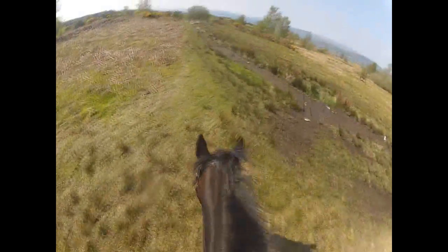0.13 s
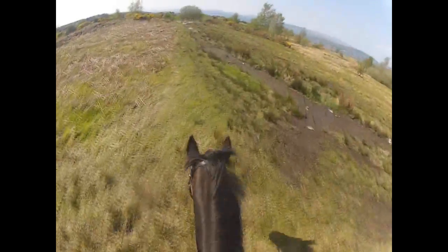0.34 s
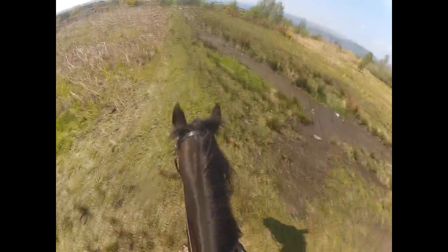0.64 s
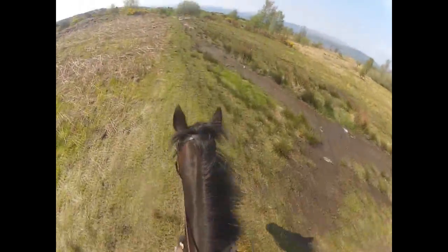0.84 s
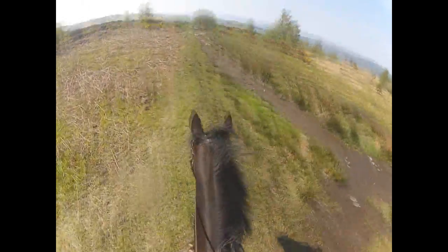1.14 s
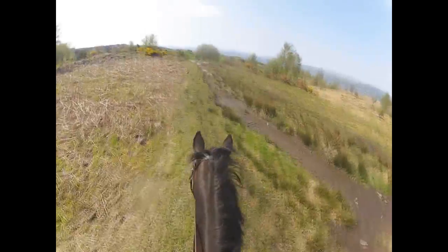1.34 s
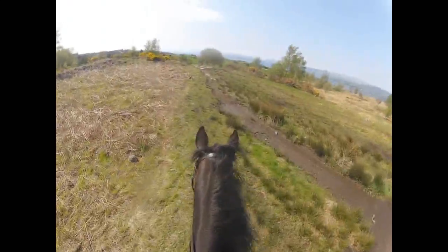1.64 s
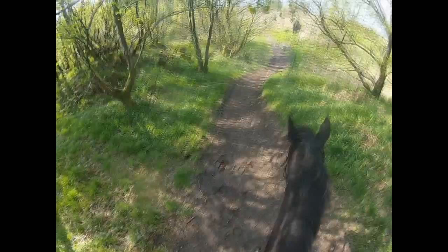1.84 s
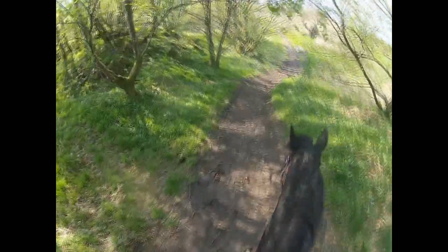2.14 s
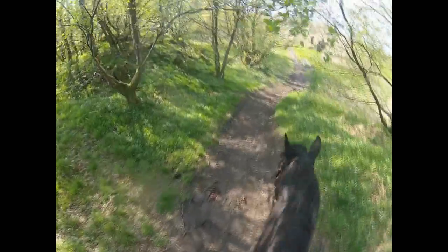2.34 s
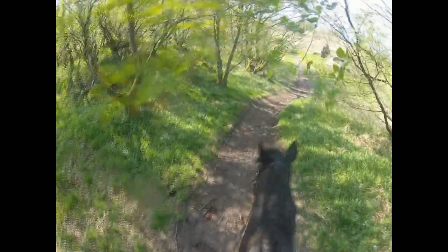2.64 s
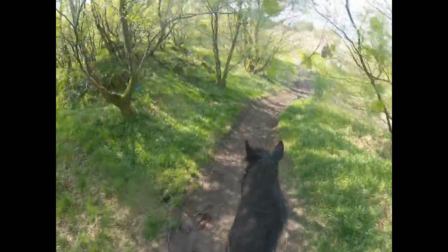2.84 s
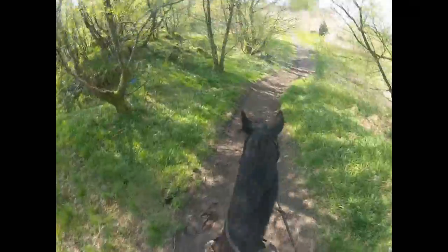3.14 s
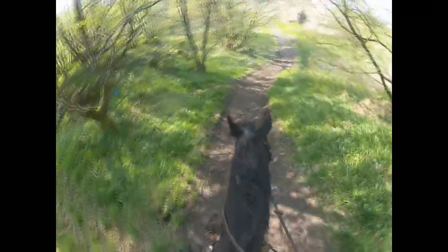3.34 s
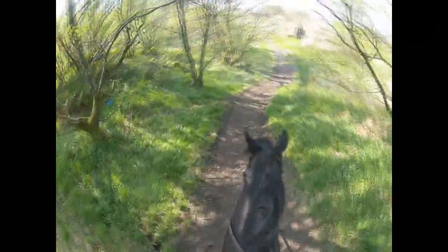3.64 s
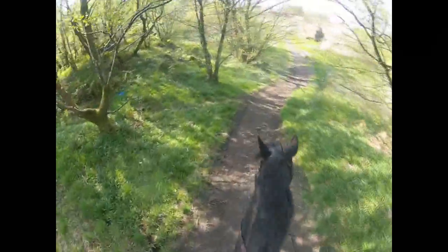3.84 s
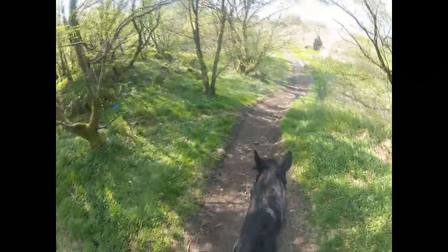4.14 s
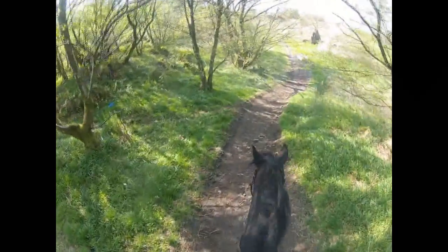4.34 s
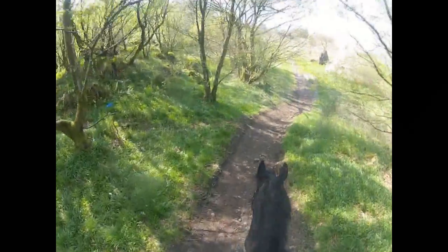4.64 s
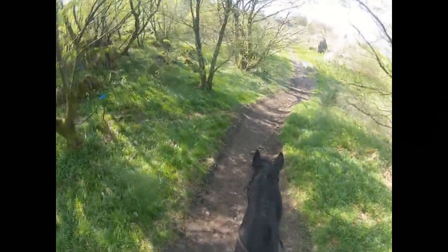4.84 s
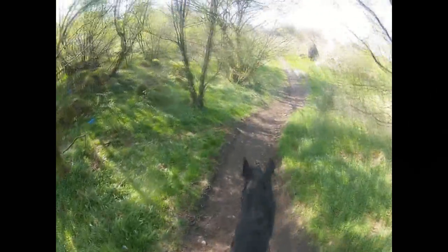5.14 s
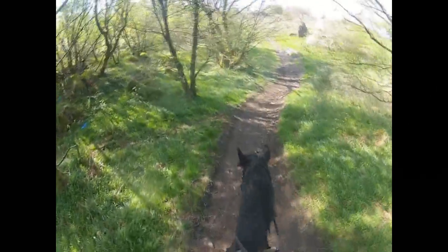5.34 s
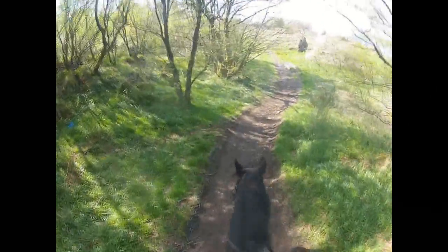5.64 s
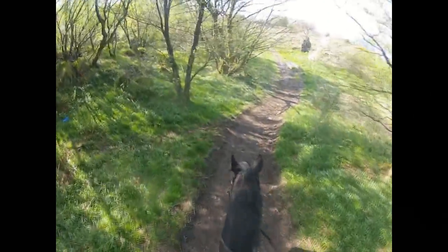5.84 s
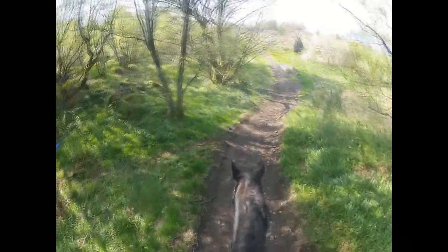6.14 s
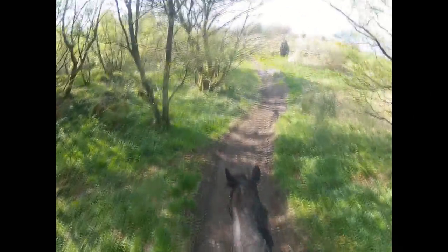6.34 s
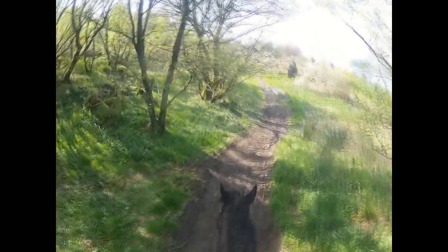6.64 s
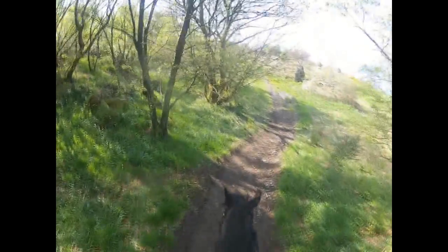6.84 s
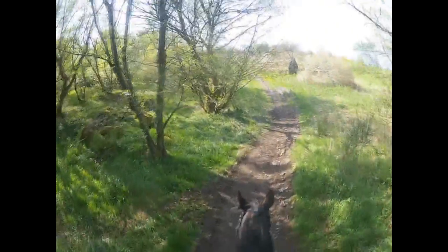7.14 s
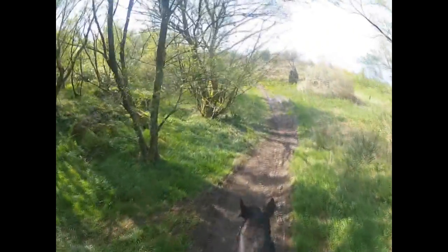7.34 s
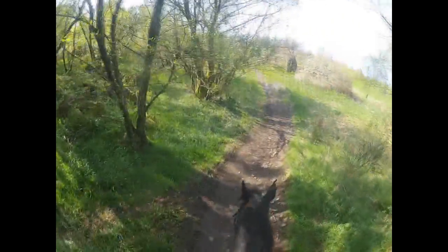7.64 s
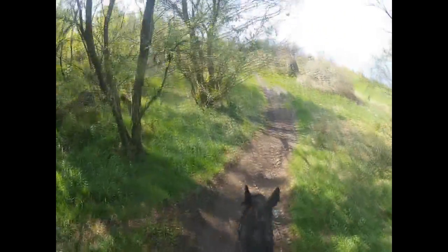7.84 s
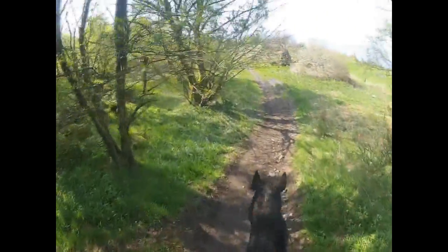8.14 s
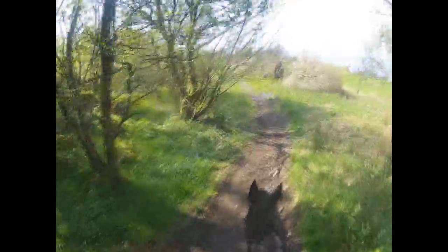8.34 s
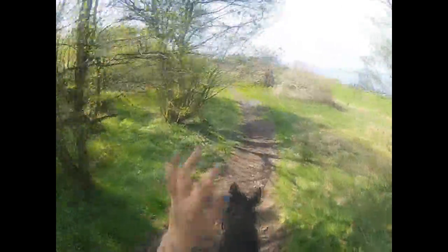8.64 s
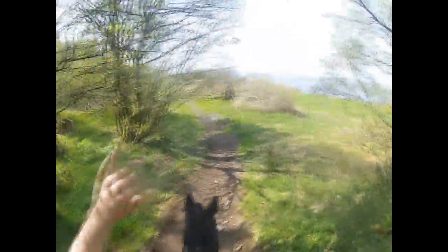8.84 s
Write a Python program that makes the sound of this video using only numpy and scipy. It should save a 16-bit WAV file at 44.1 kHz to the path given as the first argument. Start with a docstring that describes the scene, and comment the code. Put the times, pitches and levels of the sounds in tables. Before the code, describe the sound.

Muffled hoof thuds, creaks and small hollow knocks continue outdoors, interrupted by a leafy scrape and a very loud, sharp twig snap against the case.

```python
"""A horse trots over turf and then along a dirt track, heard from a cased camera worn by the rider.
Hoofbeats are short swells of bass; slipping and knocking gear is noise and impulses through ringing filters.
Leaves sweep over the case as dense tiny catches, and twigs strike it in short rattles that ring it.
A far bird chirps in gliding tones over shaped noise for the air, the wind and the swish of the ride.
The camera samples coarsely and holds each value, which mirrors the sound into the treble."""
import sys
import numpy as np
from scipy import signal
from scipy.fft import rfft, irfft, next_fast_len
from scipy.io import wavfile
from scipy.ndimage import uniform_filter1d, map_coordinates

SR = 44100
rng = np.random.default_rng(int(sys.argv[2]) if len(sys.argv) > 2 else 0)


def digitize_waveform(pressure):
    """Quantize a signal to 16-bit integers and store it at the path in sys.argv[1].

    Rows of a 2-D input are taken as channels; values are limited to [-1, 1].
    """
    field = np.atleast_2d(pressure).T
    bounded = np.clip(field, -1, 1)
    quanta = np.round(bounded * 32767).astype(np.int16)
    wavfile.write(sys.argv[1], SR, quanta)


N = 396900
TIME = np.arange(N) / SR  # [s]

# Levels in the tables are relative: the functions that use them may add a fixed trim.
# slips of the gear between the heavy beats: (start [s], length [s], level [dB])
CREAK_EVENTS = [(0, .04, -49.5), (.06, 0.077, -54), (.34, 0.082, -52.5), (.694, .12, -52.5),
                (1.04, .17, -52), (1.36, .1, -53), (1.49, 0.11, -54.5), (1.786, .13, -52),
                (2.685, 0.05, -57), (2.985, 0.082, -60), (3.405, .04, -60), (3.67, .045, -64),
                (4.474, 0.078, -57.5), (4.626, .033, -59), (4.689, .033, -50), (4.814, 0.028, -58.5),
                (4.961, .074, -58), (5.119, .03, -54), (5.186, 0.029, -49), (5.452, .06, -57.5),
                (5.885, 0.073, -54.5), (6.319, .043, -58), (6.528, 0.046, -61), (7.098, .033, -51),
                (7.196, .03, -61.5), (7.255, 0.044, -57), (7.32, 0.059, -58), (7.488, 0.057, -52),
                (7.765, 0.057, -54), (8.003, .02, -49), (8.148, 0.0456, -59), (8.26, .06, -57),
                (8.736, .11, -59.5), (8.925, 0.078, -56)]
# ring of the mount that holds the gear: (frequency [Hz], level [dB])
MOUNT_RING = [(350, -19.5), (560, -21.5), (690, -3.5), (860, -5.5), (1100, 4), (1400, -4), (1650, -2.5),
              (1900, -1.5), (2150, -13), (2800, -20.5), (3550, -22.5), (4100, -36), (5500, -53)]
# boom of the hollow case: (frequency [multiple of the body pitch], level [dB])
CASE_BOOM = [(.25, -28), (.46, -5.5), (.66, 0.5), (1, 1), (1.27, -5), (1.6, -9), (2.1, -21.5), (3.4, -33),
             (12, -95.5)]
# how much the gear jiggles, only at the trot on turf: (time [s], share [0-1])
TROT = [(0, 1), (1.9, 1), (2.02, 0)]
# air and cloth rushing past as the rider rises: (time [s], level [dB])
SWISH_LEVEL = [(0, -62.5), (1.9, -60), (2.1, -74), (6.3, -70), (7, -65.5), (9, -62)]
# tone colour of that rush: (frequency [Hz], level [dB])
SWISH_SPECTRUM = [(300, -12), (700, -5), (1200, -2), (2000, 0), (2650, -1), (3100, -15), (5000, -28)]
# tone colour of the outdoor hush: (frequency [Hz], level [dB])
HUSH_SPECTRUM = [(15, -13.5), (42, -3.5), (80, -9.5), (170, -12), (330, -15.5), (420, -20.5), (600, -25.5),
                 (1000, -31.5), (2000, -33), (3000, -37), (4500, -38), (5500, -39.5)]
# wind rumble, stronger at the faster pace on open turf: (time [s], level [dB])
WIND_LEVEL = [(0, -56), (1.3, -48.5), (2.1, -59.5), (8.7, -61), (9, -56)]
# tone colour of the wind rumble: (frequency [Hz], level [dB])
RUMBLE_SPECTRUM = [(15, -10.5), (42, 3.5), (75, -15), (140, -12.5), (300, -22), (700, -42.0), (2000, -88.5)]
# leaves sweeping over the case: (time [s], level [dB])
LEAF_LEVEL = [(1.99, -63.5), (2.096, -48), (2.186, -51.5), (2.246, -35), (2.264, -38.5), (2.344, -36.5),
              (2.354, -46), (2.364, -42), (2.39, -75)]
# tone colour of the leaves on the case: (frequency [Hz], level [dB])
LEAF_RING = [(59, -24.5), (100, -1.5), (224, -11), (256, -6), (370, -3.5), (562, -18.5), (654, -11),
             (870, -11.5), (1120, 2), (1280, -16), (1510, -2.5), (2810, -17.5), (3740, -17), (4280, -36),
             (5500, -30), (7150, -58)]
# heavy hoofbeats: (time [s], thud level [dB], level of the groan that leads into it [dB])
HOOFBEAT_EVENTS = [(0.287, -31, -47), (.639, -27.5, -48.5), (0.977, -30, -48.5), (1.334, -37.5, -50),
                   (1.714, -29, -50), (4.147, -41, -53), (5.229, -35, -52), (5.705, -41.5, -54.5),
                   (6.152, -33.5, -50), (7.118, -39.5, -48.5), (7.992, -31, -48), (8.489, -43, -57),
                   (8.945, -34, -51)]
# clear single knocks of the gear: (time [s], peak level [dB], boom of the case [dB])
KNOCK_EVENTS = [(0.447, -43, -47), (0.621, -40, -41), (0.926, -40, -36), (1.123, -39.5, -47),
                (1.483, -39, -41), (1.634, -41, -39.5), (1.709, -35, -42), (2.044, -42, -47),
                (2.688, -40.5, -44.5), (2.724, -46, -45), (3.037, -42, -44.5), (3.871, -39, -43),
                (3.938, -49, -50), (4.134, -39.5, -43), (4.313, -51.5, -51.5), (4.469, -38.5, -47),
                (4.675, -37.5, -40.5), (4.702, -39, -38), (4.859, -38, -43), (4.889, -44.5, -44),
                (4.971, -39.5, -41), (5.187, -41, -46.5), (5.34, -44.5, -50), (5.449, -45.5, -45),
                (5.596, -56.5, -43), (5.657, -43, -52), (5.791, -45, -45.5), (5.821, -42.5, -44),
                (5.89, -40, -47), (6.028, -54.5, -44), (6.122, -35.5, -42.5), (6.269, -43.5, -55),
                (6.386, -46, -45.5), (6.43, -43.5, -46.5), (6.581, -37.5, -44), (6.733, -40, -44),
                (6.755, -38, -40.5), (6.786, -37, -41), (7.098, -30, -38), (7.321, -45.5, -45),
                (7.57, -35, -41.5), (7.683, -38, -42.5), (7.731, -36, -44.5), (7.758, -41, -43.5),
                (8.001, -38.5, -41.5), (8.26, -38, -41), (8.294, -41, -44), (8.478, -31, -39),
                (8.626, -38.5, -42), (8.689, -36, -37), (8.861, -38.5, -41), (8.921, -31.5, -38)]
# twig strikes: (time [s], level [dB], contact length [s], leafy share [0-1], scrape after the blow [dB])
TWIG_STRIKES = [(1.95, -30.5, 0.0026, 0.46, -27), (3.274, -25, .0025, 0.3, -28),
                (3.282, 0.5, 0.0041, 0.05, -41), (3.291, -26, .0012, .1, -32),
                (3.3125, -25.5, 0.0033, .2, -21.5), (3.3625, -29, .004, 0.73, -27),
                (3.3715, -29, .0047, 0.56, -26), (3.378, -20.5, .0033, 0.81, -22.5)]
# ringing modes of the case under a hard strike: (frequency [Hz], width [Hz], level [dB])
CASE_MODES = [(192, 200, -10.5), (1850, 270, -1.5), (2690, 230, 4), (3042, 140, -6), (3500, 150, -1),
              (4500, 220, -21.5)]
# the case radiates little between its boom and its modes: (frequency [Hz], level [dB])
SHELL_RING = [(300, -1), (600, -10), (1100, -9), (1700, 1), (3600, -1.0), (5200, -3.5)]
# tone colour of a blow softened by leaves: (frequency [Hz], level [dB])
LEAFY_BLOW_RING = [(120, -42), (200, -12), (384, -9), (528, -17), (1120, -1), (1280, -10.5), (1490, -4),
                   (2390, -23), (3730, -15.5), (4850, -46), (5500, -39.5), (7150, -69), (12100, -120)]
# the case is jolted by the shoot and the twig: (time [s], level [dB], pitch [Hz])
CASE_JOLTS = [(2.283, -31, 59), (3.525, -19.5, 80.2), (3.536, -26, 41)]
# far bird notes: (start [s], length [s], start pitch [Hz], end pitch [Hz], level [dB])
BIRD_NOTES = [(2.458, 0.13, 4300, 4400, -74), (2.78, 0.1, 4400, 4350, -69), (4.707, .09, 4450, 4500, -70),
              (4.98, 0.15, 4450, 4400, -73), (6.813, 0.1, 4450, 4370, -66), (7.122, .12, 4450, 4330, -72)]
# tone colour of a very faint noise, opposite in the two channels: (frequency [Hz], level [dB])
SIDE_SPECTRUM = [(12, -31), (20, -1), (216, -25.5), (1050, -37), (2780, -31.5), (5000, -31), (5980, -47.5),
                 (6970, -36.5), (9000, -38.5), (11700, -73.5), (19800, -120)]

# The mount on each ground: case pitch [Hz], groan length [s], slips per second at CREAK_REF_DB,
# boom set against the rasp there [dB, before trims], extra boom per dB of force [dB]
TURF = dict(body_hz=215, groan_s=.07, slip_rate=195, boom_db=7, boom_grows=1.2)
TRACK = dict(body_hz=264, groan_s=.044, slip_rate=150, boom_db=7.5, boom_grows=-0.35)
TURF_END_S = 1.94
CREAK_REF_DB = -52
SLIP_DOUBLING_DB = 10  # this much more force doubles the slip rate, within limits
GROAN_LEAD_S = .083  # the weight comes onto the mount just before the thud
CREAK_TOP_HZ = 3500  # slipping is duller than a knock

SWISH_GROWS, SWISH_REF_DB = .6, -34  # dB of swish per dB of thud above this level
SWISH_LEAD_TURF_S, SWISH_LEAD_TRACK_S = .055, .11  # the swish peaks this long before a hoofbeat
SWISH_SPREAD = .8  # half width of a swish as a share of its lead
SWISH_REST = .14  # steady share of swish under the swells
SURGE_DB, SURGE_S = -14.5, 0.084  # rumble surge: level against the thud, half width

THUD_HZ = 42  # pitch of a hoofbeat
THUD_RISE_CYCLES = .27  # time constant of a thud's swell, in cycles of its pitch
REBOUND_S, REBOUND_LOSS_DB = .014, 10  # the gear bounces after a knock: mean flight, mean loss per bounce
SHUDDER_S, SHUDDER_FADE_S = 3.55, .1  # the case shudders around the hardest jolt
SHUDDER_DB, SHUDDER_HZ = -40, 130

HOLD_HZ = 12000  # sampling rate of the camera
BAND_HZ, TOP_HZ = 5500, 15500  # top of the band before sampling, top of the final sound


def amp(db):
    """Turn decibels into gain."""
    return 10 ** (np.asarray(db) / 20)


def unit(x):
    """Scale to an rms of 1."""
    return x / np.sqrt(np.mean(x ** 2) + 1e-20)


def crest(x):
    """Scale to a peak of 1."""
    return x / np.abs(x).max()


def add(track, s, sound):
    """Mix a sound into the track at time s, cutting off what runs past the end."""
    start = max(0, round(s * SR))
    part = track[start:start + len(sound)]
    part += sound[:len(part)]


def curve(rows):
    """Join (time [s], value) rows by straight lines."""
    return np.interp(TIME, *np.transpose(rows))


def wobble(rate):
    """A smooth random curve through this many random points a second."""
    points = rng.standard_normal(int(N * rate / SR) + 4)
    return map_coordinates(points, [TIME * rate])


def swell(s, half_width):
    """A smooth bump of height 1 around time s."""
    return np.exp(-((TIME - s) / half_width) ** 2)


def filtered(x, response):
    """Scale each frequency of x by response(frequency)."""
    size = next_fast_len(N + SR // 2)
    spectrum = rfft(x, size) * response(np.fft.rfftfreq(size, 1 / SR))
    return irfft(spectrum, size)[:N]


def low_pass(x, hz, order):
    """Take away the treble above hz without shifting the phase; a higher order is steeper."""
    return filtered(x, lambda f: 1 / np.sqrt(1 + (f / hz) ** (2 * order)))


def gain(points, hz):
    """Read the gain of (frequency [Hz], level [dB]) points on a log frequency axis."""
    f, db = np.transpose(points)
    return amp(np.interp(np.log(hz + 1), np.log(f), db))


def coloured_noise(points):
    """Noise of rms 1 with the given spectrum."""
    return unit(filtered(rng.standard_normal(N), lambda hz: gain(points, hz)))


def ring(points, size=4096):
    """The ringing of a body after one tap: an impulse response of energy 1 with the given spectrum."""
    cepstrum = irfft(np.log(gain(points, np.fft.rfftfreq(size, 1 / SR)) + 1e-6))
    # folding the cepstrum forward makes the response start at once (minimum phase)
    cepstrum[1:size // 2] *= 2
    cepstrum[size // 2 + 1:] = 0
    response = irfft(np.exp(rfft(cepstrum)))[:size // 2]
    return response / np.linalg.norm(response)


def boom(hz):
    """The hollow case ringing around one pitch."""
    return ring([(multiple * hz, db) for multiple, db in CASE_BOOM])


def slips(n, rate, uneven, scatter_db, count):
    """Stick and slip over n samples: impulses of varying size that slow down as the load settles, rms 1."""
    gaps, sizes = np.clip(rng.standard_normal((2, count)), -2, 2)
    at = np.cumsum(np.exp(uneven * gaps)) * SR / rate
    at = at * (.88 + .12 * at / n)  # the gaps grow longer
    places = (at - at[0] / 2).astype(int)
    return unit(np.bincount(places, amp(scatter_db * sizes), n)[:n])


def rattle(contact, size=2048):
    """A blow smeared over the contact time: each frequency has its own delay, all equally strong."""
    knots = rng.uniform(0, 1, size // 32)
    positions = np.linspace(0, len(knots) - 1, size // 2 + 1)
    delay = contact * np.interp(positions, np.arange(len(knots)), knots)
    phase = 2 * np.pi * np.cumsum(delay) * SR / size
    return irfft(np.exp(-1j * phase))[:size // 4]


def thud(db, hz):
    """A cycle or two of bass that swells and dies away."""
    t = np.arange(SR // 4) / SR
    u = t * hz / THUD_RISE_CYCLES
    envelope = crest(u * u * u * np.exp(-u))
    return amp(db) * envelope * np.sin(2 * np.pi * hz * t)


def ground_at(s):
    """Turf first, then the dirt track."""
    return TURF if s < TURF_END_S else TRACK


def creaks():
    """Under the load of a step the mount slips in a run; more force slips faster, evening into a groan."""
    out, rasp = np.zeros(N), ring(MOUNT_RING)
    groans = [(s - GROAN_LEAD_S, ground_at(s)["groan_s"], db) for s, _, db in HOOFBEAT_EVENTS]
    for start, length, db in groans + list(CREAK_EVENTS):
        ground = ground_at(start)
        force_db = db - CREAK_REF_DB
        n = max(int(length * SR), SR // 100)
        rate = np.clip(ground["slip_rate"] * 2 ** (force_db / SLIP_DOUBLING_DB), 75, 205)
        uneven = np.interp(rate, [90, 200], [.32, .17])  # fast slips are more regular
        load = 0.8 + 0.18 * np.hanning(n)  # the weight comes on and goes off again
        catches = slips(n, rate, uneven, scatter_db=4.5, count=64)
        rubbing = rng.standard_normal(SR)[:n]
        friction = load * (0.8 * catches + 0.62 * rubbing)
        boom_db = db + ground["boom_db"] + ground["boom_grows"] * force_db
        add(out, start, amp(db - 3) * signal.fftconvolve(friction, rasp))
        add(out, start, amp(boom_db - 2.0) * signal.fftconvolve(friction, boom(ground["body_hz"])))
    return low_pass(out, CREAK_TOP_HZ, order=3)


def jiggle():
    """At the trot the gear never rests between steps: wavering noise rings the mount and the case."""
    friction = curve(TROT) * amp(2.5 * wobble(25)) * rng.standard_normal(N)
    body = amp(-70.5) * ring(MOUNT_RING) + amp(-55.5) * boom(hz=230)
    return signal.fftconvolve(friction, body)[:N]


def swish():
    """Noise swells as the rider rises ahead of each hoofbeat: more for a heavier one, quicker on turf."""
    rising = np.full(N, SWISH_REST)
    for s, db, _ in HOOFBEAT_EVENTS:
        lead = SWISH_LEAD_TURF_S if s < TURF_END_S else SWISH_LEAD_TRACK_S
        strength = amp(SWISH_GROWS * (db - SWISH_REF_DB))
        rising = rising + strength * swell(s - lead, SWISH_SPREAD * lead)
    level = amp(curve(SWISH_LEVEL) + 1.2 * wobble(60))
    return level * rising * coloured_noise(SWISH_SPECTRUM)


def air():
    """Soft outdoor hush, wind rumble that surges with each heavy hoofbeat, and a faint narrow whine."""
    hush = coloured_noise(HUSH_SPECTRUM)
    rumble = coloured_noise(RUMBLE_SPECTRUM)
    whine = unit(filtered(rng.standard_normal(N), lambda hz: np.exp(-((hz - 5090) / 45) ** 2)))
    surges = sum(amp(db + SURGE_DB) * swell(s, SURGE_S) for s, db, _ in HOOFBEAT_EVENTS)
    wind = (amp(curve(WIND_LEVEL)) + surges) * amp(2.0 * wobble(10))
    hush_level = amp(-58.0 + 0.6 * wobble(11.0))
    return hush_level * hush + wind * rumble + amp(-85.5) * whine


def leaves():
    """A leafy shoot drags over the case in dense tiny catches; the colour shifts as the contact moves."""
    catches = slips(N, rate=520, uneven=.4, scatter_db=6.0, count=6000)
    scrape = 0.57 * catches + 0.84 * rng.standard_normal(N)
    # random louder and softer patches, blurred over frequency and then time, shift the colour
    spectrogram = signal.stft(scrape, nperseg=512)[2]
    patches = uniform_filter1d(rng.standard_normal(spectrogram.shape), 3, 0)
    patches = unit(uniform_filter1d(patches, 4, 1))
    scrape = unit(signal.istft(spectrogram * amp(3 * patches), nperseg=512)[1][:N])
    level = amp(curve(LEAF_LEVEL) + 1.3 * wobble(90))
    return signal.fftconvolve(scrape * level, ring(LEAF_RING))[:N]


def hooves():
    """Each heavy footfall comes up through horse and rider as a dull thud."""
    out = np.zeros(N)
    for s, db, _ in HOOFBEAT_EVENTS:
        add(out, s, thud(db, THUD_HZ))
    return out


def bounces(count):
    """A knock and its rebounds at uneven gaps, each with a further loss: (delay [s], loss [dB])."""
    flights = REBOUND_S * rng.uniform(.5, 1.5, count)
    losses = REBOUND_LOSS_DB + 2 * rng.standard_normal(count)
    return [(0, 0), *zip(np.cumsum(flights), np.cumsum(losses))]


def knocks():
    """The mount slips once, chatters for a moment and booms in the case, then bounces."""
    out, t = np.zeros(N), np.arange(SR // 30) / SR
    rasp, body = ring(MOUNT_RING), boom(hz=273.5)
    for s, db, boom_db in KNOCK_EVENTS:
        for delay, loss_db in bounces(count=2):
            chatter = 0.11 * rng.standard_normal(len(t)) * amp(-60 * t / 0.032)
            add(chatter, 0, rattle(contact=0.002993))
            add(out, s + delay, amp(db - loss_db - 1.0) * crest(np.convolve(chatter, rasp)))
            push = 0.043 * rng.standard_normal(len(t)) * amp(-60 * t / 0.031)
            push[0] -= 1
            add(out, s + delay, amp(boom_db - loss_db + 7) * crest(np.convolve(push, body)))
    return out


def twigs():
    """Bare wood rattles on the case for a few milliseconds and rings its modes; leaves soften the blow."""
    out, t = np.zeros(N), np.arange(SR // 25) / SR
    case = np.zeros(len(t))
    for hz, width, db in CASE_MODES:
        fade = np.exp(-np.pi * width * t)  # a wider mode dies away sooner
        case += amp(db) * width * fade * np.cos(2 * np.pi * hz * t)
    case = np.convolve(case, ring(SHELL_RING))
    case = case / np.linalg.norm(case)
    leaf = ring(LEAFY_BLOW_RING)
    for s, db, contact, leafy, scrape_db in TWIG_STRIKES:
        blow = amp(scrape_db - 60 * t / 0.037) * rng.standard_normal(len(t))  # the wood scrapes on briefly
        add(blow, 0, rattle(contact))
        hard = np.convolve(blow, case)[:len(t)]
        soft = np.convolve(blow, leaf)[:len(t)]
        add(out, s, amp(db + 14.5) * ((1 - leafy) * hard + leafy * soft))
    return out


def jolts():
    """Branches shove the case, which thumps in the bass and shudders as noise through its boom."""
    thumps = np.zeros(N)
    for s, db, hz in CASE_JOLTS:
        add(thumps, s, thud(db, hz))
    fade = np.exp(-np.abs(TIME - SHUDDER_S) / SHUDDER_FADE_S)
    shake = amp(SHUDDER_DB) * fade * rng.standard_normal(N)
    shudder = signal.fftconvolve(shake * amp(3.6 * wobble(30)), boom(SHUDDER_HZ))[:N]
    return thumps + shudder


def bird():
    """Thin notes from distant trees: gliding tones blurred by a fast random waver in pitch."""
    out, waver = np.zeros(N), 85 * wobble(220)  # waver in Hz
    for s, length, start_hz, end_hz, db in BIRD_NOTES:
        n = int(length * SR)
        hz = np.linspace(start_hz, end_hz, n) + waver[round(s * SR):][:n]
        tone = np.sin(2 * np.pi * np.cumsum(hz) / SR)
        add(out, s, amp(db - 4.5) * np.hanning(n) * tone)
    return out


def scene():
    """The closed case gives both channels the same sound."""
    gear = creaks() + jiggle() + knocks()
    ride = hooves() + swish() + air()
    branches = leaves() + twigs() + jolts()
    mono = gear + ride + branches + bird()
    return np.array([mono, mono])


def record(dry):
    """The microphone clips; sample-and-hold mirrors its narrow band around the sampling rate."""
    narrow = low_pass(np.clip(dry[0], -.8, .8), BAND_HZ, order=16)
    mirrored = narrow * (1 + 2 * np.cos(2 * np.pi * HOLD_HZ * TIME))
    held = filtered(mirrored, lambda hz: np.sinc(hz / HOLD_HZ))  # holding each value dulls the treble
    side = amp(-78.5) * coloured_noise(SIDE_SPECTRUM)  # very faint noise, opposite in the two channels
    return np.array([low_pass(held + sign * side, TOP_HZ, order=60) for sign in (1, -1)])


dry = scene()
out = record(dry)
digitize_waveform(out)
```